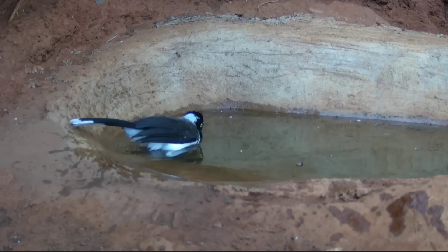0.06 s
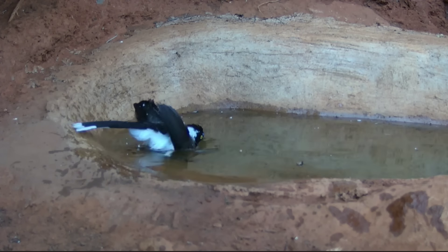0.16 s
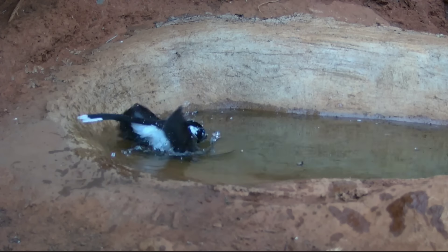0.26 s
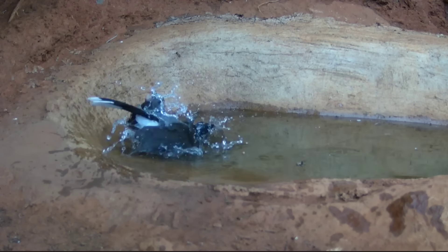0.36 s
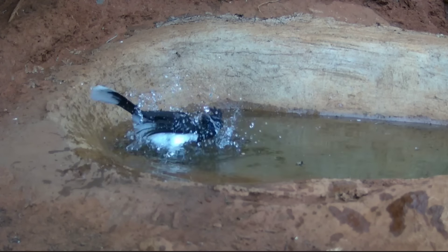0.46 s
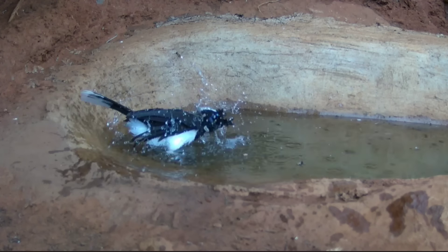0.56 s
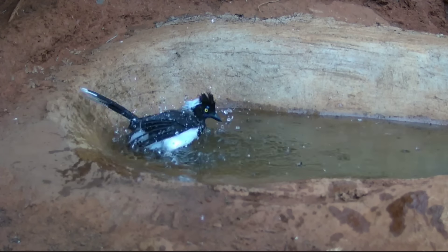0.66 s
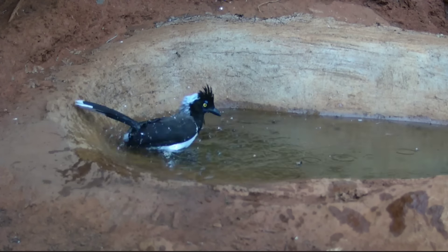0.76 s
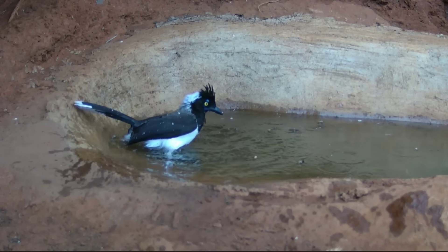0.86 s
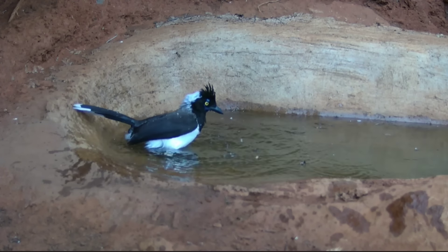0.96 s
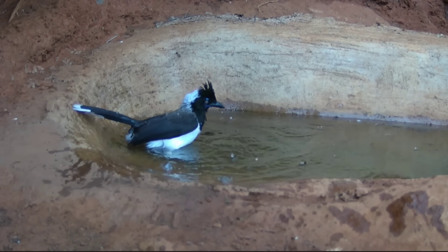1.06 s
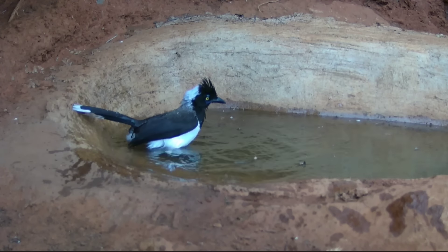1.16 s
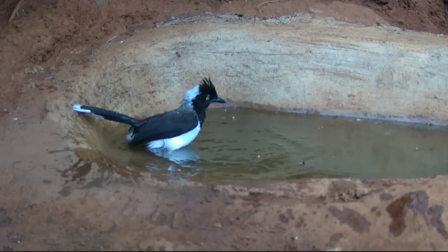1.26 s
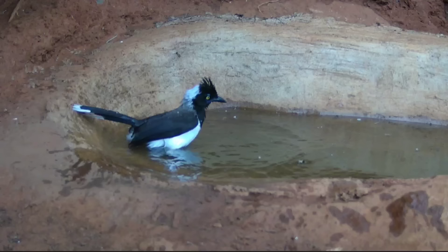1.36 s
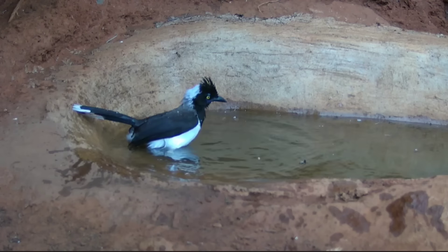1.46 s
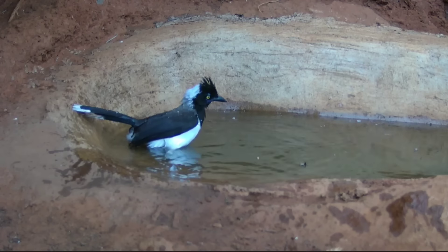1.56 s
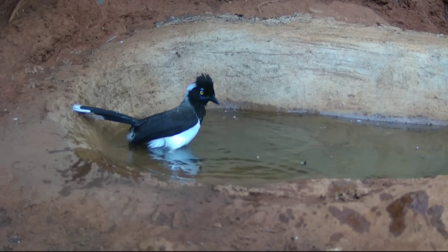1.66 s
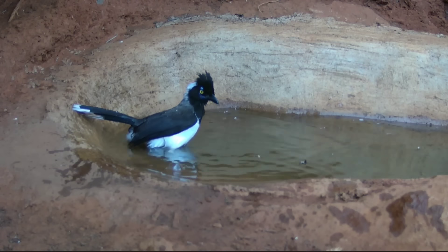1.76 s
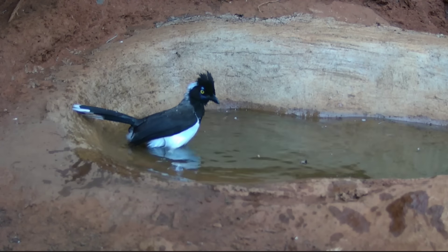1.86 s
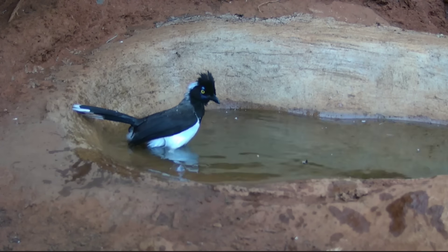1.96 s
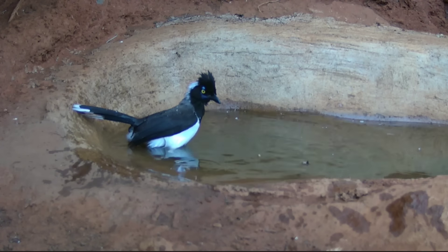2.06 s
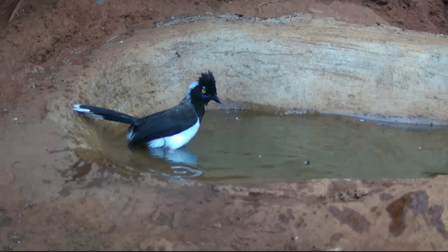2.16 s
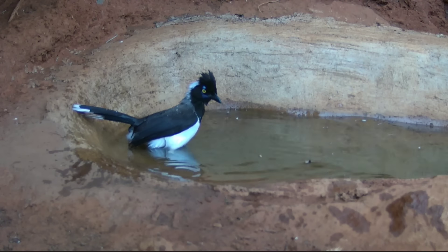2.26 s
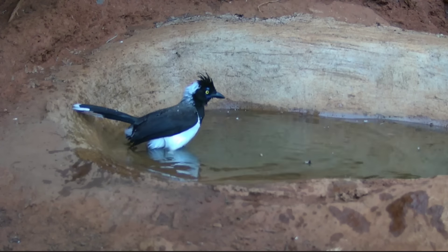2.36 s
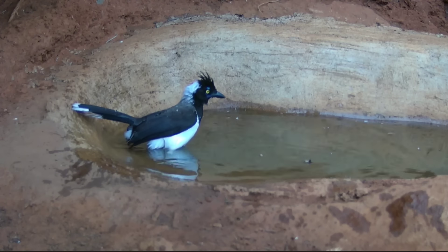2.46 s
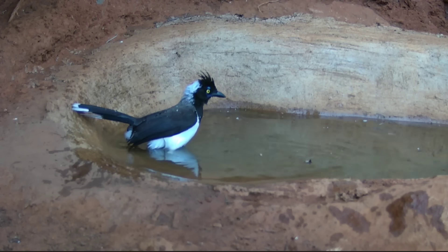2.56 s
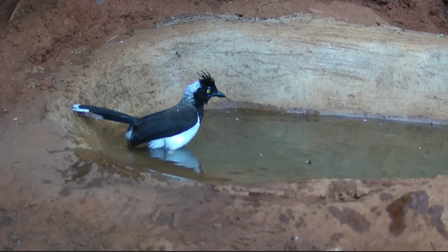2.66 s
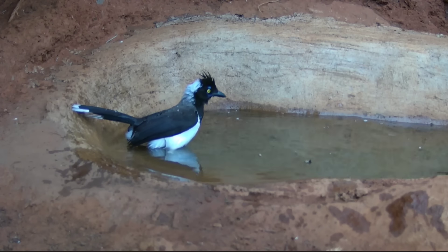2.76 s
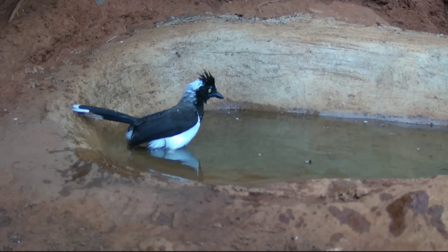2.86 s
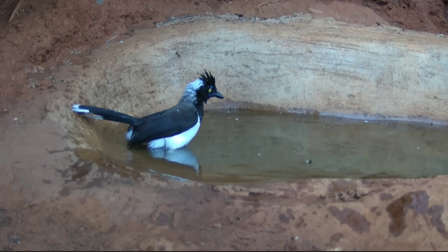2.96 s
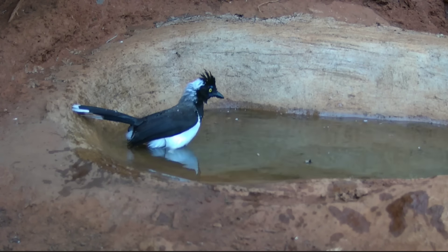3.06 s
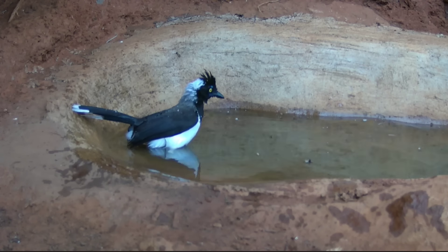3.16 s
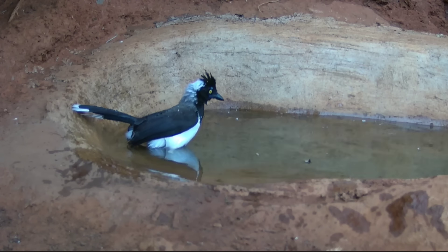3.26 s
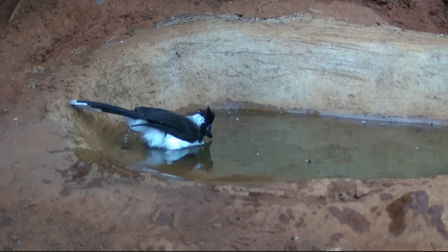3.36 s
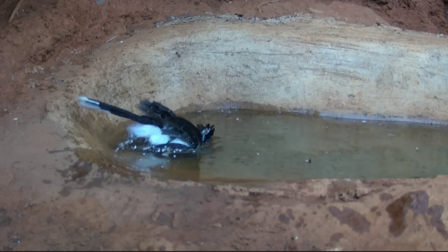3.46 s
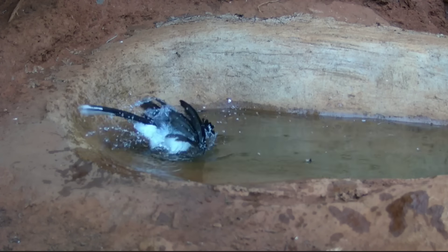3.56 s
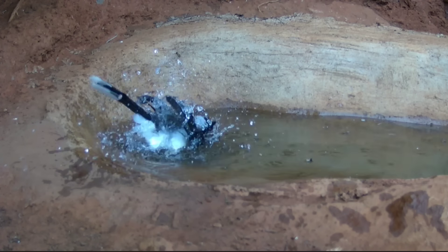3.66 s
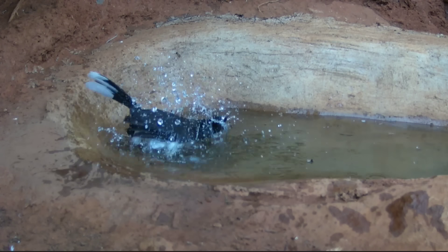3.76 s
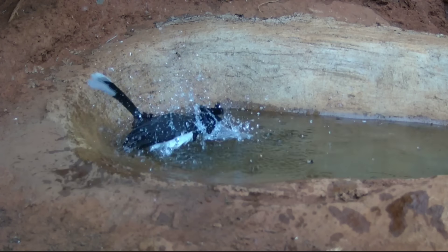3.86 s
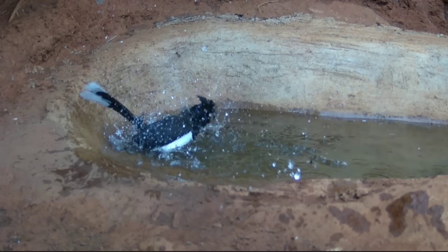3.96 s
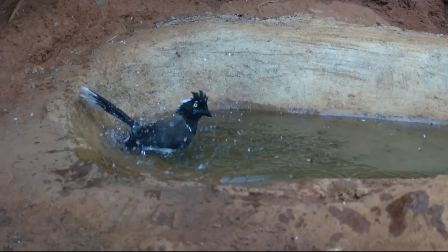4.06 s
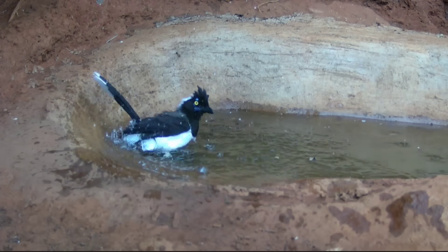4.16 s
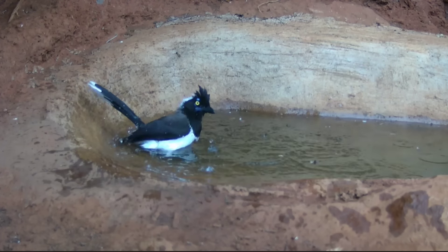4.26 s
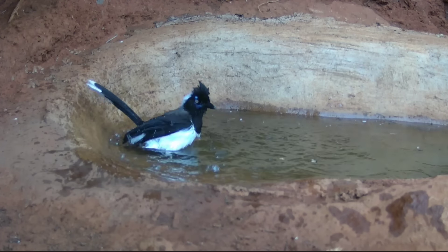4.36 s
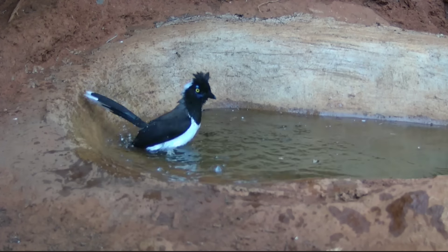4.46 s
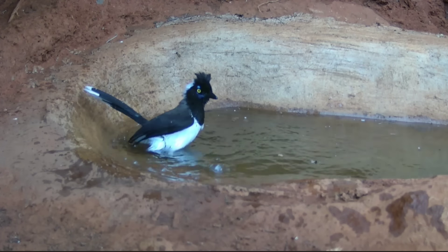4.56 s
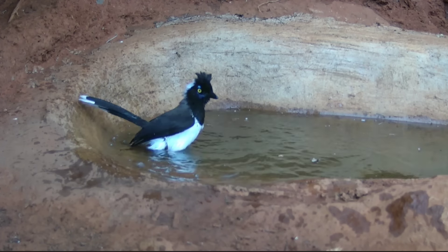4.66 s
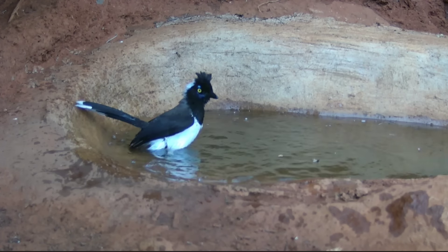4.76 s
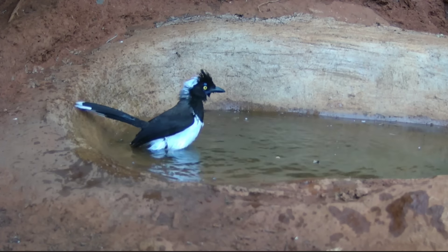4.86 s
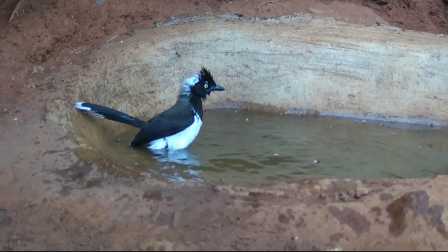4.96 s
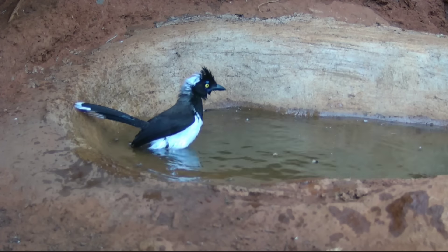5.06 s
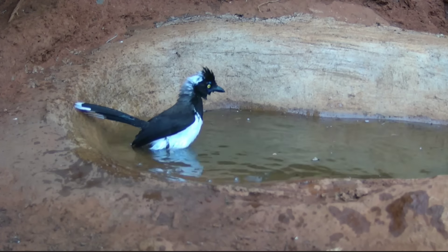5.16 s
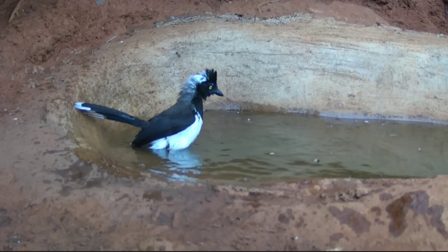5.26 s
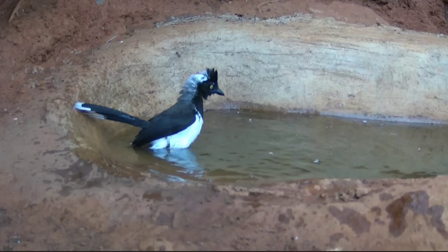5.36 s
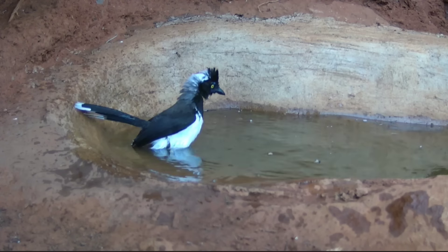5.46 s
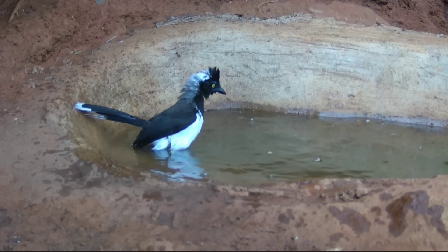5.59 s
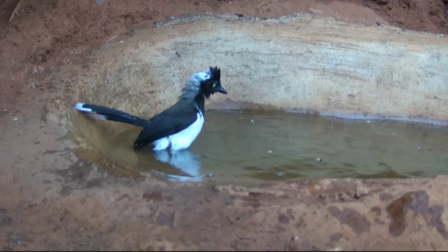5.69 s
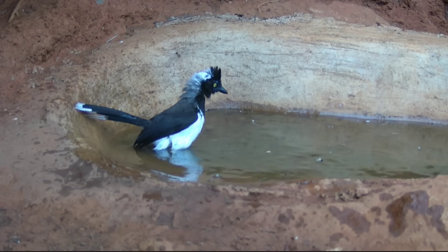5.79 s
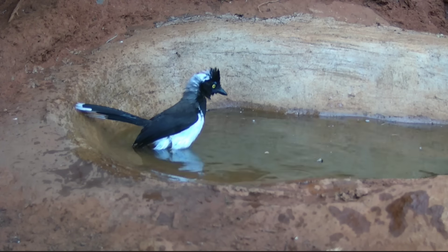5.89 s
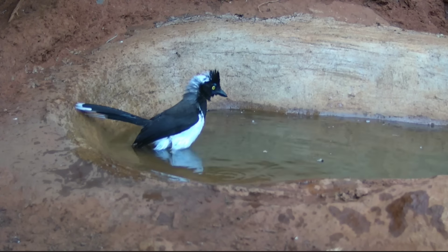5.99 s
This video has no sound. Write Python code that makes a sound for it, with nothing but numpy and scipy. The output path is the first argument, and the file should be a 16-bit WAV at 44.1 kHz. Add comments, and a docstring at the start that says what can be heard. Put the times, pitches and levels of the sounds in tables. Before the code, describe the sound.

A bird bathes in a shallow pool in two brief, rapid fluttering splash bouts with bubbly plops, between quiet stretches of low wind rumble.

```python
"""In a shallow rock pool a bird bathes in short bouts. Wing slaps are decaying noise bursts, spray and
beaten water are filtered noise and random clicks, and trapped bubbles are dying sines that climb in pitch.
The rock wall returns quick reflections. Wind buffets the microphone as a wobbling low swing over
a distant rumble of filtered noise, and a few far birds whistle faintly as gliding sines."""
import sys
import numpy as np
from scipy import signal
from scipy.fft import rfft, irfft
from scipy.io import wavfile
from scipy.ndimage import uniform_filter1d

SR = 44100
rng = np.random.default_rng(int(sys.argv[2]) if len(sys.argv) > 2 else 0)


def linear_from_db(decibels):
    """Turn decibels (scalar or array-like) into linear amplitude factors; 0 gives 1."""
    return 10 ** (np.asarray(decibels, float) / 20)


def store_wav(level_fs):
    """Save 16-bit WAV to argv[1]."""
    pcm = np.round(np.clip(np.atleast_2d(level_fs), -1, 1) * 32767)
    wavfile.write(sys.argv[1], SR, pcm.T.astype(np.int16))


N = 265923

# Spectrum of beaten water. Each row: frequency in Hz, relative level in dB per Hz.
CHURN_SPECTRUM = [(400, -42), (700, -5), (1000, -10), (1500, -5.5), (2400, -0.5), (3300, -3), (4300, -11.5),
                  (5300, -14.5), (7000, -56.5)]
# Spectrum of fine spray. Each row: frequency in Hz, relative level in dB per Hz.
SPRAY_SPECTRUM = [(2470, -33), (4200, -8.5), (4320, -15), (4970, -12.5), (6200, 1.5), (7400, 2.5),
                  (7870, -1), (8700, -16), (11300, -59), (19100, -120)]


def evened(x):
    """Normalisation: scales a signal to rms 1, so that a later gain sets its level."""
    return x / np.sqrt(np.mean(x ** 2) + 1e-20)


def add(mix, start_s, sound):
    """Superposition: sounds add sample by sample from their start time."""
    part = mix[round(start_s * SR):][:len(sound)]
    part += sound[:len(part)]


def coloured(x, spectrum):
    """Minimum-phase filtering: the Hilbert transform of the log gain gives the phase of a causal filter."""
    hz, db = np.transpose(spectrum)
    grid = abs(np.fft.fftfreq(8192, 1 / SR))
    gain_db = np.interp(np.log(grid + 1), np.log(hz + 1), np.maximum(db, -70))
    log_gain = gain_db * np.log(10) / 20
    response = np.exp(np.conj(signal.hilbert(log_gain)))
    taps = np.fft.ifft(response).real[:4096]
    return signal.oaconvolve(x, taps)[:len(x)]


def band(x, lo_hz, hi_hz):
    """Band-pass filtering: a Butterworth filter keeps the range between two corner frequencies."""
    return signal.sosfilt(signal.butter(2, [lo_hz, hi_hz], "bandpass", fs=SR, output="sos"), x)


def drops(per_s, spread_db):
    """Random impulse train: sparse clicks of random sign with exponentially spread levels, a few large."""
    level_db = spread_db * np.minimum(rng.exponential(1, N), 4)
    size = linear_from_db(level_db) * rng.choice([-1, 1], N)
    return size * (rng.random(N) < per_s / SR)


def ring(hz, end_hz, t60_s):
    """Bubble resonance: a dying sine that climbs in pitch as the bubble nears the surface."""
    t = np.arange(round(t60_s * 0.33 * SR)) / SR  # faded out within a third of the 60 dB decay time
    pitch = hz + (end_hz - hz) * (t / t[-1]) ** 2
    onset = 1 - np.exp(-t / 0.00098)
    fade_out = signal.windows.tukey(2 * len(t), .3)[len(t):]
    shape = linear_from_db(-60 * t / t60_s) * onset * fade_out
    return shape * np.sin(2 * np.pi * np.cumsum(pitch) / SR)


def effort(level_db=-60, follows=1):
    """Amplitude modulation: a layer's gain follows the bird's effort, all but silent between bouts.

    level_db is the gain at -60 dB effort, follows the dB of gain per dB of effort."""
    # How hard the bird beats the water, one curve a bout. Each row: time in seconds, effort in dB.
    bouts = [
        [(0.17, -89), (0.268, -66), (0.39, -58), (0.45, -60), (0.52, -66), (0.68, -65), (0.74, -73),
         (0.806, -84)],
        [(3.44, -72), (3.512, -67), (3.56, -59.5), (3.77, -54), (3.91, -61.5), (4.002, -55), (4.09, -60),
         (4.218, -68.5), (4.33, -81.5), (4.428, -71.5), (4.62, -84)],
    ]
    t, gain = np.arange(N) / SR, np.zeros(N)
    for rows in bouts:
        s, db = np.transpose(rows)
        gain += linear_from_db(np.interp(t, s, level_db + follows * (db + 60), left=-140, right=-140))
    return gain


def churn(count=40):
    """Superposed random events: beaten water is many small bubbles, pattering drops, spray and low slosh."""
    swarm, fizz = np.zeros((2, N))
    for pitch, cycles, rise in rng.random((count, 3)):
        hz = 1000 * 4.2 ** pitch
        bubble = ring(hz, hz * (1 + 0.51 * rise ** 2), (20 + 60 * cycles ** 2) / hz)
        swarm += signal.oaconvolve(drops(34, 3.24), bubble)[:N]
        hz = 5400 * 1.55 ** pitch  # the tiniest bubbles tick in the spray
        tick = ring(hz, hz * (1 + 0.046 * rise), (40 + 60 * cycles) / hz)
        fizz += signal.oaconvolve(drops(10, 5.4), tick)[:N]
    wash = rng.standard_normal((3, N))
    # water lands in bursts
    puff_shape = signal.windows.hann(160) ** 1.2
    puffs = evened(signal.oaconvolve(abs(drops(130, 4.4)), puff_shape)[:N])
    patter = evened(drops(900, 7.6))
    body = 0.82 * evened(swarm) + 0.43 * patter + 0.2 * wash[0] * (puffs + 0.81)
    spray = evened(wash[1] * (puffs + 0.87)) + 0.33 * evened(fizz)
    slosh = band(wash[2] * (puffs + 1.5), 80, 750)
    return (effort() * evened(coloured(body, CHURN_SPECTRUM))
            + effort(-71.5, 0.87) * evened(coloured(spray, SPRAY_SPECTRUM))
            + effort(-67, 0.71) * evened(slosh))


def slaps():
    """Impact noise: each blow is a sharp burst around its body pitch, a shorter spray hiss and a low thump."""
    # Wing slaps. Each row: start in seconds, body peak in dB, body pitch in Hz,
    # spray peak in dB, thump peak in dB.
    wing_slaps = [(0.2173, -60, 1610, -57, -60.5), (0.281, -52, 2290, -53, -52),
                  (0.2931, -42, 1790, -54.5, -42.5), (0.3234, -45, 2520, -48, -51),
                  (0.373, -36.5, 2620, -52, -45.5), (0.3994, -54, 2180, -51, -57),
                  (0.4196, -37, 2350, -34.5, -56), (0.4698, -46.5, 1630, -68, -48),
                  (0.4895, -54, 2000, -52, -50), (0.508, -59, 1630, -51, -81),
                  (0.5382, -46.5, 3140, -52.5, -68), (0.5916, -45, 1720, -63, -54),
                  (0.6362, -54, 1590, -57.5, -78), (0.6467, -52.5, 2050, -57, -58),
                  (0.669, -50, 1850, -65, -77), (3.464, -51.5, 2000, -72, -54),
                  (3.5267, -53, 1780, -64, -54), (3.536, -34.5, 2200, -52, -53),
                  (3.5499, -58, 1870, -45, -54.5), (3.5942, -43, 2070, -62, -77),
                  (3.657, -47.5, 1760, -57, -69), (3.6911, -56, 2390, -49, -68),
                  (3.7043, -36.5, 2150, -72, -71), (3.7404, -43.5, 2920, -49, -59),
                  (3.7709, -36.5, 2370, -54, -53), (3.8216, -38, 1910, -52.5, -50),
                  (3.8755, -36, 1740, -45.5, -44.5), (3.922, -50, 1780, -41.5, -50),
                  (4.0437, -40.5, 2200, -70, -51), (4.112, -56, 1600, -68, -46.5),
                  (4.142, -49.5, 1800, -56.5, -79), (4.1679, -45, 1610, -53.5, -78),
                  (4.2158, -48.5, 1590, -46, -62), (4.411, -52.5, 1820, -65.5, -59),
                  (4.426, -48, 1720, -64, -50)]
    # Single drops falling back. Each row: start in seconds, body peak in dB, spray peak in dB.
    drips = [(0.6986, -67, -60), (0.7146, -64, -76), (0.7446, -55, -63.5), (0.7923, -56, -91),
             (0.8136, -66, -63.5), (0.9247, -69, -69), (0.944, -66.5, -73), (0.9995, -70, -67.5),
             (1.114, -57, -73), (1.3663, -74, -81), (3.9066, -75, -58), (4.2507, -57.5, -66),
             (4.2834, -76, -57.5), (4.3775, -56, -66), (4.4467, -71, -61), (4.482, -60, -62),
             (4.6698, -72, -69.5)]
    slap_t60_s, drip_t60_s, t60_spread_db = 0.031, 0.034, 2.5  # decay times before their chance variation
    drip_hz, drip_thump_db = 1850, -3  # thump relative to the body peak
    out, t = np.zeros(N), np.arange(4000) / SR
    blows = [(*row, slap_t60_s) for row in wing_slaps]
    blows += [(s, db, drip_hz, spray_db, db + drip_thump_db, drip_t60_s) for s, db, spray_db in drips]
    noises = rng.standard_normal((len(blows), 3, 4001))
    for (s, db, hz, spray_db, thump_db, t60_s), noise in zip(blows, noises):
        varied_t60_s = np.clip(t60_s * linear_from_db(t60_spread_db * noise[0, 0]), .005, .2)
        fall = linear_from_db(-60 * t / varied_t60_s)
        onset = 1 - np.exp(-t / 0.00061)
        burst = fall * onset * noise[:, 1:] + 3.7 * (t == 0)  # the first contact is a click
        body = band(burst[0], 0.71 * hz, 1.078 * hz) + 0.38 * coloured(burst[0], CHURN_SPECTRUM)
        spray = coloured(burst[1] * fall ** 0.64, SPRAY_SPECTRUM)
        thump = band(burst[2], 150, 910)
        for peak_db, part in ((db, body), (spray_db, spray), (thump_db, thump)):
            add(out, s, linear_from_db(peak_db) * part / abs(part).max())
    return out


def bubbles():
    """Volume resonance of trapped air: the larger bubbles ring out clearly, each at its own pitch."""
    # Steady bubbles. Each row: start in seconds, level in dB, pitch in Hz, 60 dB decay time in ms.
    ringing = [(0.326, -43, 1460, 40), (0.332, -45, 2560, 52), (0.353, -47, 1590, 41),
               (0.448, -47.5, 1350, 100), (0.471, -43.5, 3370, 15), (0.486, -45, 1040, 31),
               (0.535, -46, 3130, 26), (0.592, -49, 1530, 31), (0.624, -51.5, 987, 64),
               (0.717, -52, 2480, 30), (0.717, -50.5, 1410, 56), (0.794, -38.5, 913, 155),
               (0.817, -58, 2330, 26), (3.506, -55.5, 3500, 22), (3.546, -49, 1360, 54),
               (3.616, -45.5, 2770, 29), (3.657, -52, 1700, 45), (3.77, -38.5, 1650, 20),
               (3.943, -35, 1690, 59), (3.976, -49.5, 2700, 25), (4.05, -42.5, 937, 72),
               (4.112, -47.5, 1080, 78), (4.123, -38, 1450, 21), (4.446, -59, 3820, 23),
               (4.492, -56.5, 4000, 25), (4.433, -41, 1354, 44), (4.459, -52, 1740, 25),
               (4.518, -53.5, 929, 77), (4.546, -60, 2555, 25), (4.33, -65.5, 2397, 47),
               (4.425, -56.5, 904, 97), (4.189, -58, 950, 65)]
    # Rising bubble tones, some the closing upward sweep of a longer ring. Each row: start in seconds, level in
    # dB, # start pitch in Hz, end pitch in Hz, 60 dB decay time in ms.
    sweeping = [(0.303, -49.5, 449, 1450, 98), (0.498, -52, 1240, 1630, 83), (0.56, -61, 2180, 2820, 43),
                (0.836, -48, 1007, 2370, 55), (3.594, -44, 1790, 2140, 27), (4.066, -38.5, 2180, 2580, 25),
                (4.23, -45.5, 950, 1220, 63), (4.378, -52, 2011, 2310, 63)]
    rise = 0.06  # share by which the pitch of a steady bubble climbs
    out = np.zeros(N)
    rows = [(s, db, hz, hz * (1 + rise), t60_ms) for s, db, hz, t60_ms in ringing] + sweeping
    for s, db, hz, end_hz, t60_ms in rows:
        add(out, s, linear_from_db(db) * ring(hz, end_hz, np.clip(t60_ms, 10, 300) / 1000))
    return out


def wall_echo(water):
    """Early reflection: convolution with sparse, decaying impulses returns the splashes from the rock wall."""
    t = np.arange(3000) / SR
    arrivals = (rng.random(3000) < .05) * rng.choice([-1, 1], 3000)
    wall = arrivals * linear_from_db(-60 * t / .075) * (t > .002)  # 60 dB decay in 75 ms, from 2 ms on
    return linear_from_db(-11) * signal.oaconvolve(water, wall / np.linalg.norm(wall))[:N]


def wind():
    """Turbulent pressure at the microphone: eddies make a wobbling low swing with rough lumps."""
    # Strength of the gusts. Each row: time in seconds, level in dB.
    gusts = [(0.0, -52.5), (0.34, -50), (0.45, -56), (0.62, -45.5), (0.81, -53), (0.84, -51), (1.29, -62.5),
             (1.48, -62.5), (1.66, -37), (1.75, -57.5), (1.85, -34.5), (1.9, -42.5), (1.96, -29),
             (2.1, -44.5), (2.15, -37), (2.3, -60.5), (2.52, -50), (2.62, -57), (3.06, -46.5),
             (3.09, -41.5), (3.16, -52), (3.83, -53), (3.9, -60), (3.96, -42), (4.11, -49.5), (4.15, -58.5),
             (4.8, -55.5), (5.21, -64.5), (5.27, -54.5), (6.03, -63)]
    # How fast the eddies swing. Each row: time in seconds, mean swing rate in Hz.
    eddies = [(0, 24.7), (0.9, 19.9), (1.4, 29.4), (1.7, 20.5), (1.85, 26.6), (1.96, 38), (2.15, 32.3),
              (2.5, 34), (3.1, 30), (3.5, 23.8), (4.0, 20), (4.6, 35), (6.03, 31.8)]
    s, db = np.transpose(gusts)
    t, chance = np.arange(N) / SR, rng.standard_normal((3, N))
    wobble, lumps = (evened(uniform_filter1d(uniform_filter1d(v, 600), 600)) for v in chance[:2])
    swing_hz = np.interp(t, *np.transpose(eddies)) * (1 + .22 * wobble)
    turns = np.cumsum(swing_hz) / SR
    rough = evened(band(band(chance[2], 11, 60), 11, 60))
    swing = linear_from_db(4.0 * lumps) * np.sin(2 * np.pi * turns) + 0.61 * rough
    return linear_from_db(uniform_filter1d(np.interp(t, s, db), 700)) * evened(swing)


def far_birds():
    """Frequency modulation: faint gliding whistles, blurred in pitch and level by distance."""
    # Each row: start in seconds, end in seconds, start pitch in Hz, end pitch in Hz, mean level in dB.
    whistles = [(1.079, 1.115, 4300, 3700, -82), (2.25, 2.41, 3501, 3830, -95),
                (2.457, 2.574, 3380, 3120, -91), (2.62, 2.722, 3150, 3440, -89),
                (2.871, 3.08, 2035, 2210, -86), (4.773, 4.817, 3930, 4250, -87),
                (5.34, 5.372, 4300, 3940, -91)]
    out = np.zeros(N)
    for s, end, hz, end_hz, db in whistles:
        pitch = np.linspace(hz, end_hz, round((end - s) * SR))
        noises = rng.standard_normal((2, 12000))
        waver, blur = (evened(uniform_filter1d(v, 400))[:len(pitch)] for v in noises)
        tone = np.sin(2 * np.pi * np.cumsum(pitch * (1 + 0.0034 * blur)) / SR)
        add(out, s, linear_from_db(db) * (1 + 0.35 * waver) * signal.windows.tukey(len(pitch), .5) * tone)
    return out


def air():
    """Spectral shaping of noise: the distant rumble and hiss of the outdoors."""
    # Each row: frequency in Hz, relative level in dB per Hz.
    spectrum = [(20, -23), (40, -5), (60, -16), (92, -2), (130, -10.5), (200, -19.5), (300, -25.5),
                (600, -33), (1070, -35), (2000, -38.5), (3000, -44), (4000, -52), (5200, -58), (7270, -49),
                (8700, -63.5), (9500, -81.5)]
    hz, db = np.transpose(spectrum)
    grid = np.fft.rfftfreq(N, 1 / SR)
    gain = linear_from_db(np.interp(np.log(grid + 1), np.log(hz + 1), db))
    return linear_from_db(-62.5) * evened(irfft(rfft(rng.standard_normal(N)) * gain, N))


def scene():
    """Superposition: the water and its reflections add to the birds, the wind and the outdoor air."""
    water = churn() + slaps() + bubbles()
    return (water + wall_echo(water) + far_birds() + wind() + air())[None]


def low_pass(x):
    """Removes everything above the highest recorded frequency."""
    return signal.sosfilt(signal.butter(12, 15700, fs=SR, output="sos"), x)


def record(dry):
    """Band limiting and self-noise: the microphone's steep low-pass, then the recorder's own faint hiss."""
    edge_hz, hiss_db = 8890, -93
    taps = signal.firwin(255, edge_hz, window=("kaiser", 7), fs=SR)
    limited = signal.oaconvolve(dry, taps[None], "same")
    hiss = linear_from_db(hiss_db) * rng.standard_normal(dry.shape)
    return low_pass(limited + hiss)


dry = scene()
out = record(dry)
store_wav(out)
```